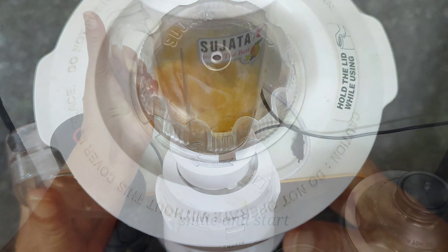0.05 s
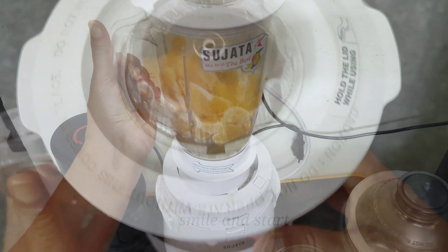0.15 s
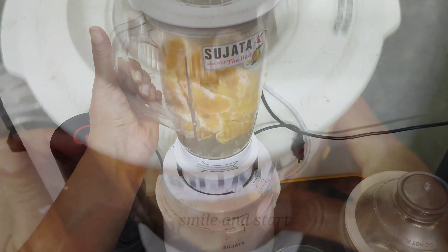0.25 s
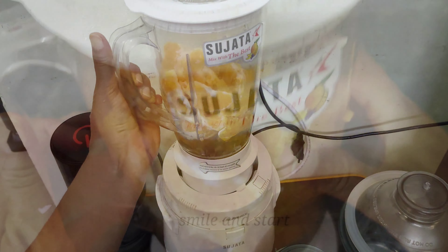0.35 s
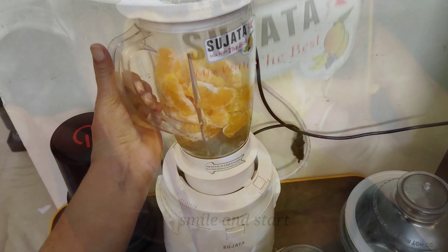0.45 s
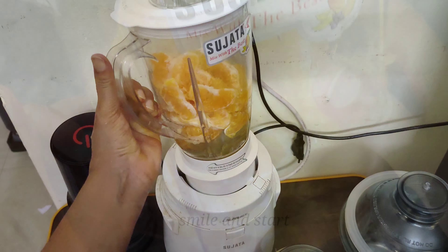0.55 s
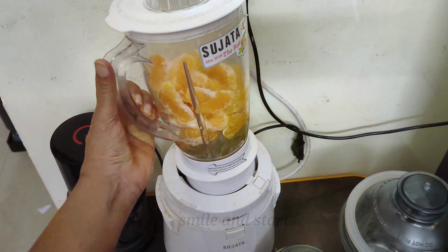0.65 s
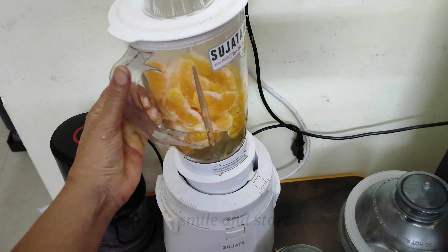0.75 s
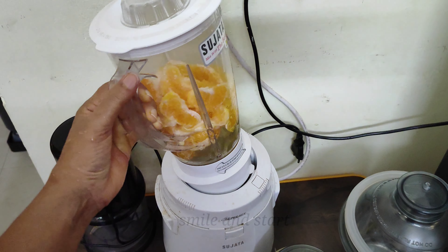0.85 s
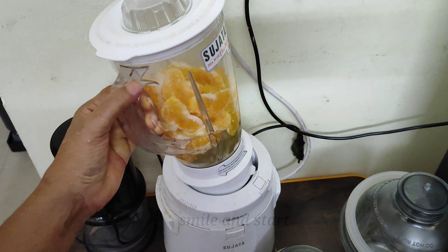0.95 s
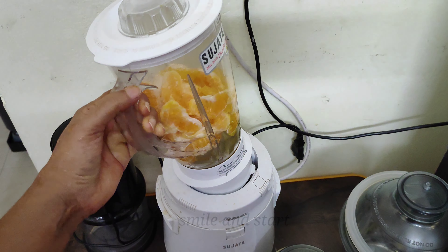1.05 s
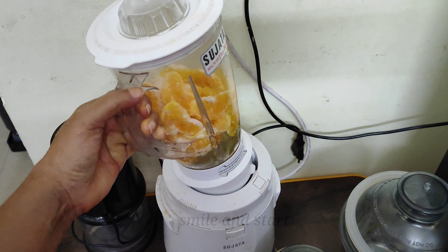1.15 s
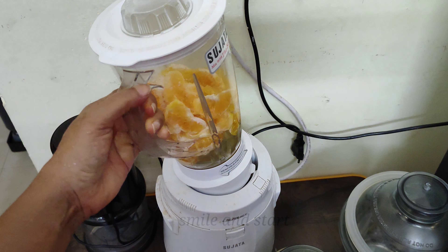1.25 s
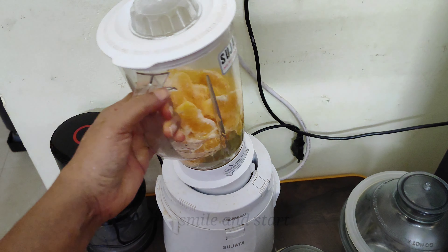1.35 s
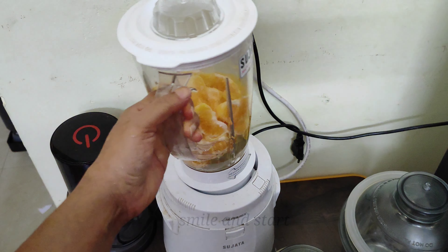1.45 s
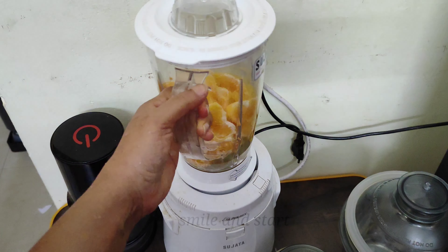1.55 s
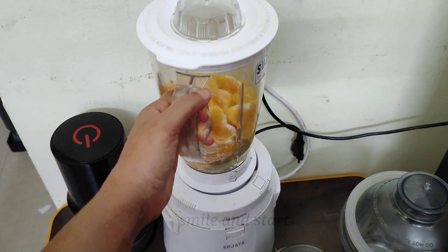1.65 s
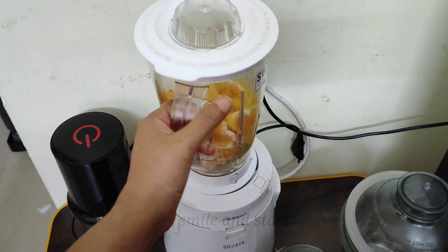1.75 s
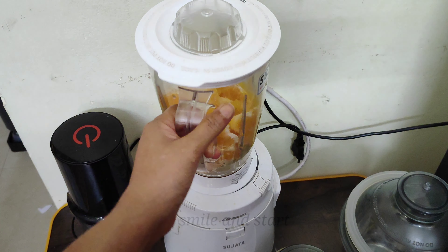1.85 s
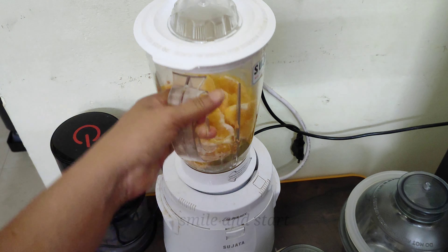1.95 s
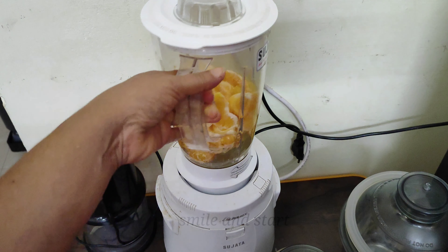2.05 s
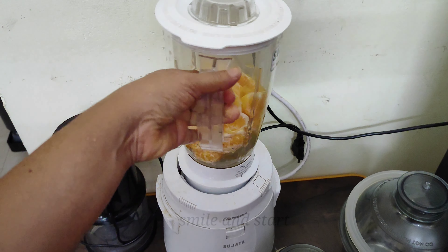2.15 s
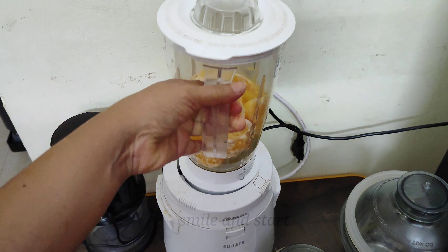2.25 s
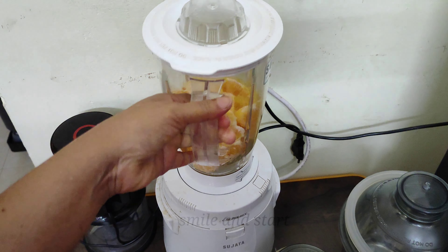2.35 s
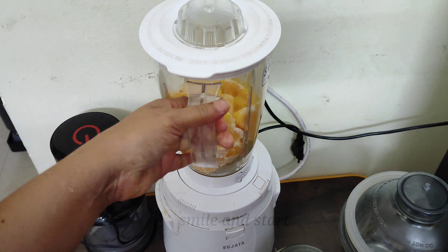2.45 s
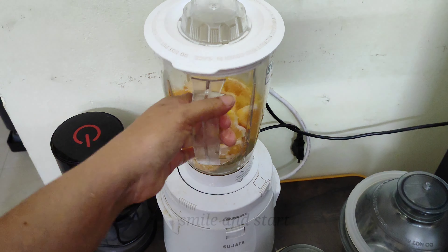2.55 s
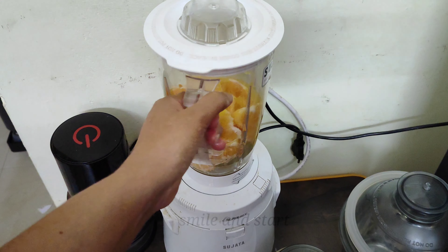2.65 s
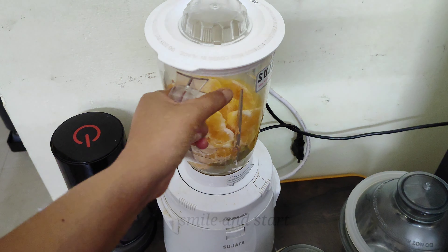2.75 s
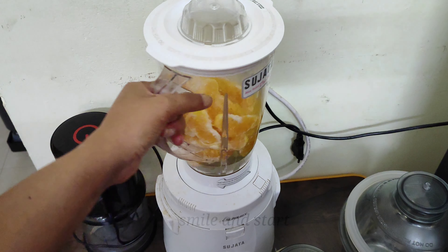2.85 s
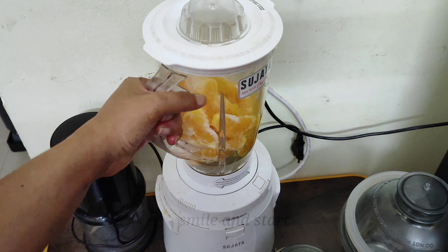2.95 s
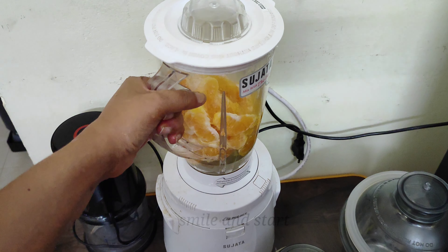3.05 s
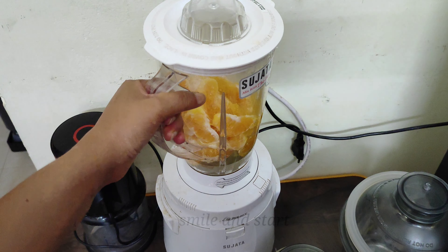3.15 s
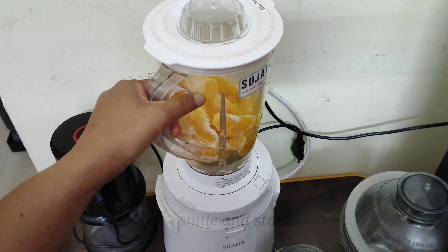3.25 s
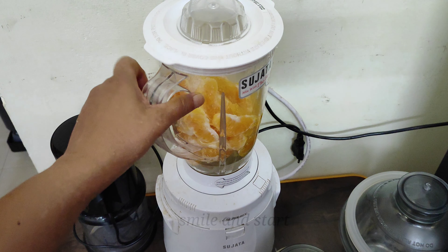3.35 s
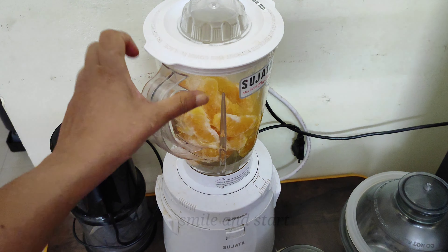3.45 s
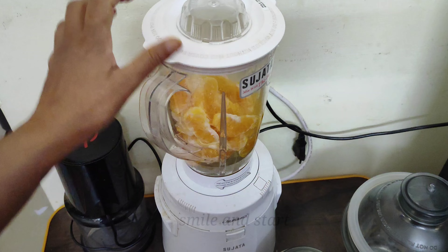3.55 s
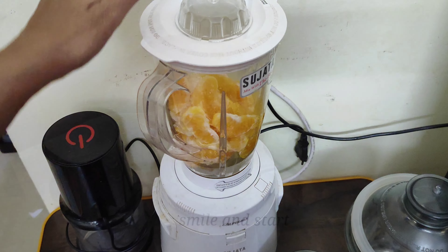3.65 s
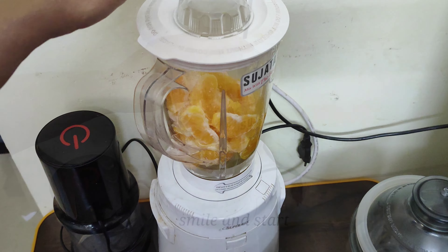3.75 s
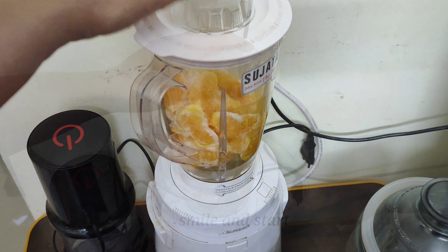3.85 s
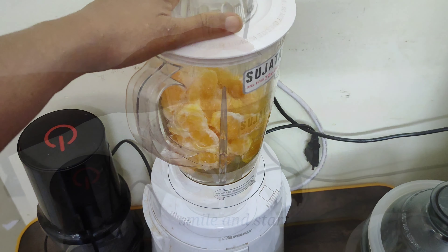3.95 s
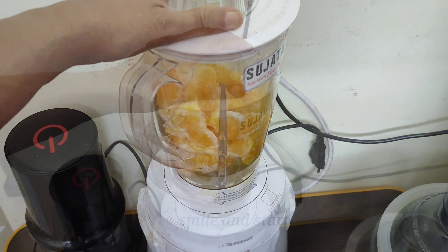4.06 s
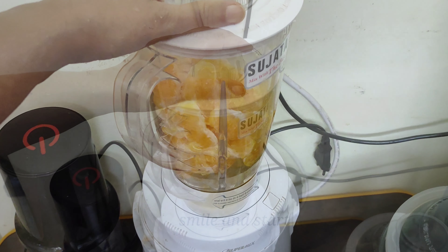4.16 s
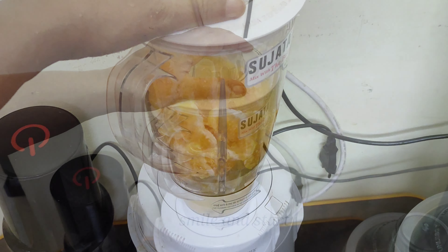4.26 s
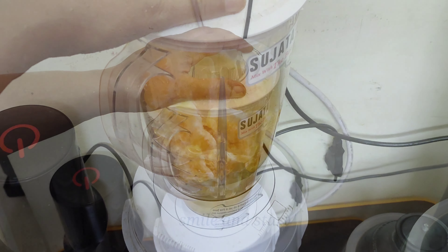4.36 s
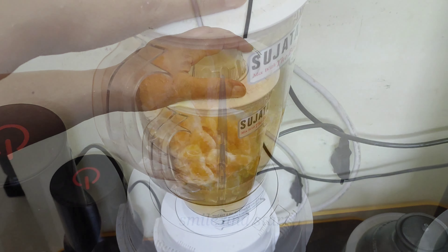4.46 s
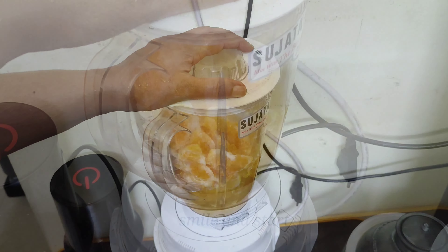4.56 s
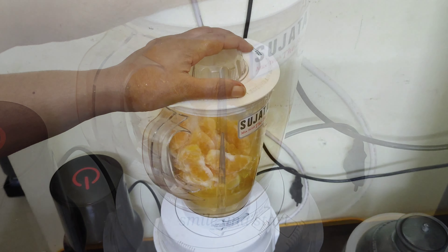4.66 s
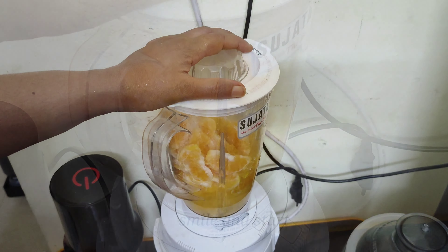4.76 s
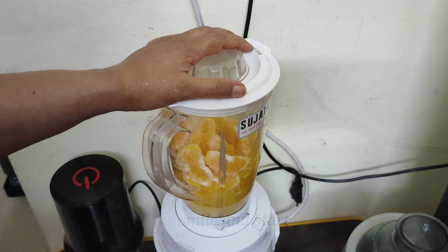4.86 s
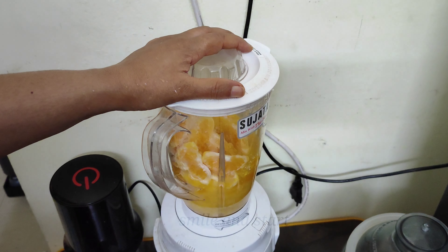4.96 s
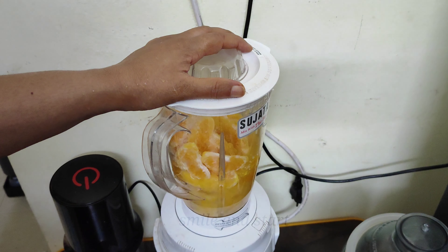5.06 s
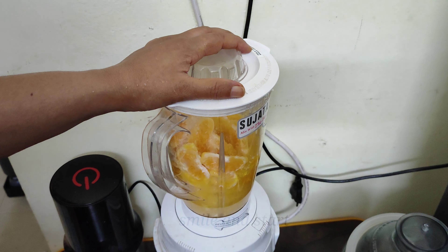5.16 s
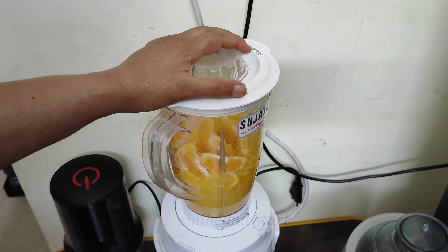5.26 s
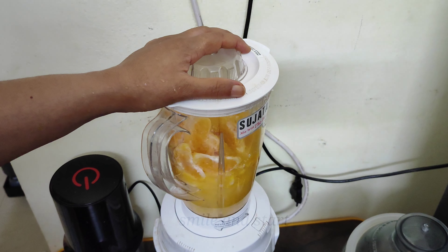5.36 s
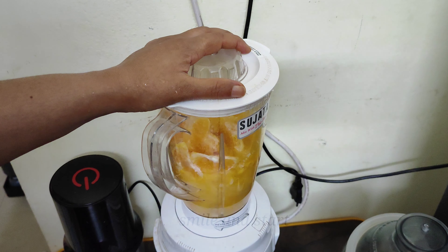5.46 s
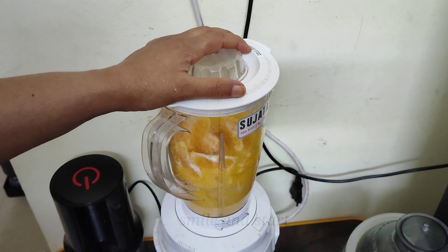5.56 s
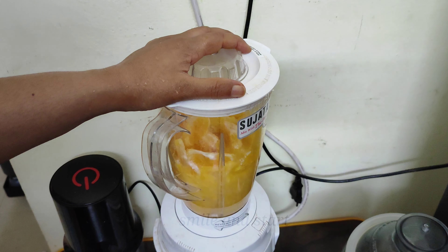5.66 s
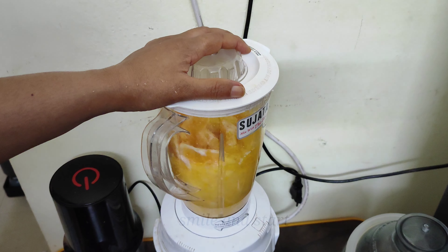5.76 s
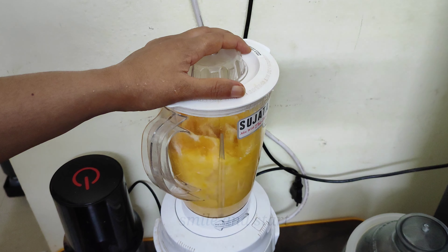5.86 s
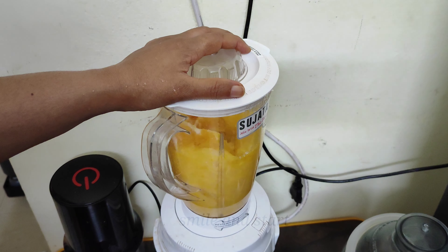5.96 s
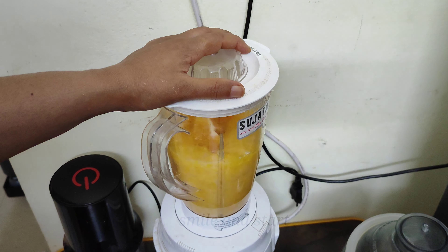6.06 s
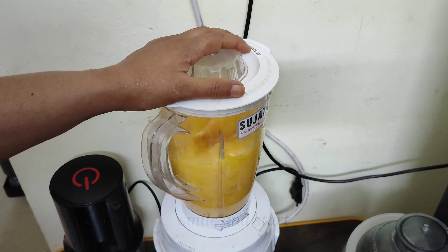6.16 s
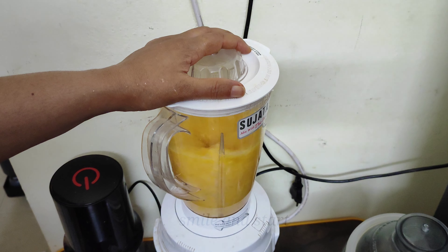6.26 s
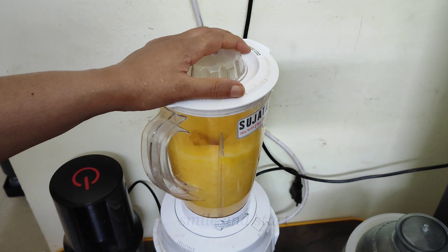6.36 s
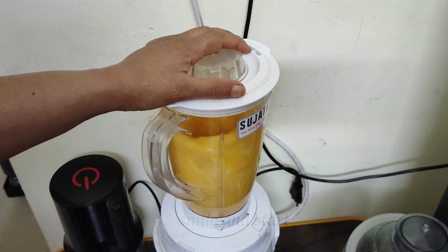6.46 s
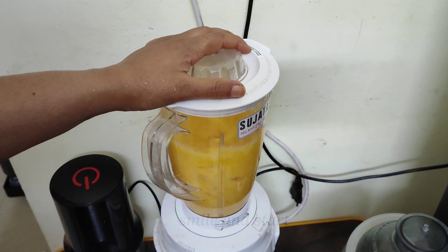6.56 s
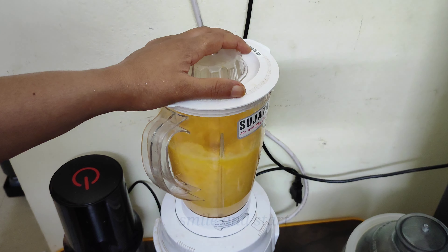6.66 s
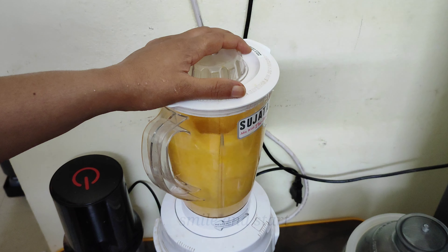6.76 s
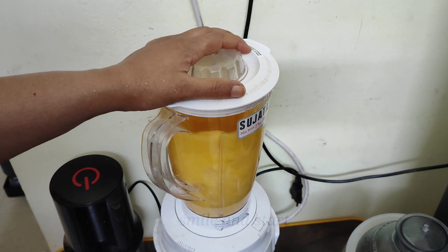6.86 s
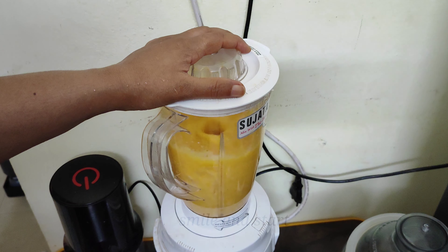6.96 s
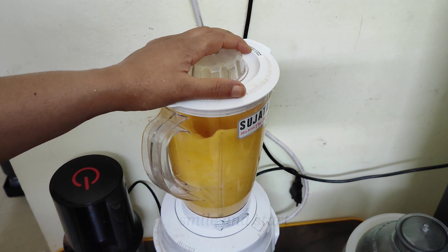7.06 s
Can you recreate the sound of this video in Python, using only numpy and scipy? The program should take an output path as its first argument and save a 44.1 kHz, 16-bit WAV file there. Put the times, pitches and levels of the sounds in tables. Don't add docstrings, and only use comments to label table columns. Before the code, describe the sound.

Plastic jar clatters and locks into place in an echoing kitchen, a soft lid pat, then a blender whirs up into a roaring, wet churn.

```python
import sys
import numpy as np
from scipy import signal
from scipy.fft import rfft, irfft, next_fast_len
from scipy.io import wavfile
from scipy.ndimage import uniform_filter1d, map_coordinates

SR = 44100
rng = np.random.default_rng(int(sys.argv[2]) if len(sys.argv) > 2 else 0)


def gain_from_db(level_db):
    decades = np.asarray(level_db, float) / 20
    return 10 ** decades


def wav_record(signal):
    frames = np.transpose(np.atleast_2d(signal))
    bounded = np.clip(frames, -1, 1)
    quanta = np.round(bounded * 32767).astype(np.int16)
    wavfile.write(sys.argv[1], SR, quanta)


N = 313478

# [f/Hz, time to fall 60 dB/s]
KITCHEN_DECAY = [(100, 0.69), (300, 0.52), (1000, 0.57), (3000, 0.47), (10000, 0.4)]
# [f/Hz, likeness 0 to 1]
LIKENESS = [(40, 0.28), (130, 1), (290, 1), (630, 0.55), (1400, 0.3), (3000, 0.35), (6000, 0.2),
            (11000, 0.3)]
# [f/Hz, level/dB]
MICROPHONE_DIFFERENCE = [(60, 0.5), (300, 0.6), (700, -1.5), (1400, 0.5), (5000, -0.2), (7300, 5),
                         (9000, -13), (11500, -5), (14500, -0.5)]
# [f/Hz, level against the mean/dB]
MASKING = [(2500, -17), (3600, -9), (5000, -7), (6500, -8), (7500, -7.5), (8600, -10), (10500, -9),
           (11500, -10), (13000, -10.5), (15000, -10.5)]

# [t/s, length/s, start f/Hz, end f/Hz, level/dB]
CHIRPS = [
    (0, 0.035, 3450, 3360, -54),
    (0.035, 0.039, 4450, 3700, -51),
    (0.073, 0.04, 3700, 3740, -55),
    (0.153, .045, 4150, 3900, -54),
    (0.2, .04, 3650, 3700, -60),
]

# [f/Hz, level/dB per Hz]
AIR_COLOUR = [(12, -42), (20, -0.5), (152, 1), (236, -24), (339, -7), (1030, -14.5), (2000, -17.5),
              (4240, -19.5), (4870, -29.5), (6790, -27.5), (7380, -36), (9210, -29), (15200, -22)]
# [f/Hz, level/dB per Hz]
RUB_COLOUR = [(24, -50), (40, -26), (70, 2.5), (296, 2.5), (443, -14), (637, -5), (1220, -15),
              (1340, -13.5), (1580, -15.5), (5000, -28.5), (6500, -65.5), (11000, -120)]
# [f/Hz, level/dB per Hz]
RUSTLE_COLOUR = [(2350, -14.5), (4000, -13), (4760, -16), (6760, -15.5), (8260, -39), (8690, -14),
                 (9500, -12.5), (13100, -15), (15200, -53)]
# [f/Hz, level/dB per Hz]
RUMBLE_COLOUR = [(15, -41), (30, -17), (70, -16), (110, -7), (160, -35), (300, -120)]
# [t/s, rubbing level/dB]
GRIP = [(0.0, -52), (0.3, -71), (0.47, -39), (0.73, -44), (0.79, -54), (0.87, -29.5), (1.24, -42.5),
        (1.42, -48), (1.5, -38.5), (1.92, -51), (2.1, -45.5), (2.21, -39), (2.45, -47), (2.78, -40.5),
        (2.95, -41.5), (3.41, -56), (3.95, -59), (4.14, -62)]
# [t/s, extra rumble level/dB, half length/s]
SHOVES = [
    (0.337, 31, 0.06),
    (0.7, 28, 0.049),
    (.97, 17, 0.093),
    (1.32, 9, .05),
    (2.8, 5, .06),
    (3.25, 5, .08),
]

# [t/s, peak level/dB]
TICKS = [(0.218, -42), (0.259, -46.5), (0.316, -23), (0.432, -36), (0.469, -45), (0.734, -35.5),
         (0.862, -46), (0.882, -11), (0.983, -15.5), (1.237, -31.5), (1.567, -26), (1.907, -46),
         (1.934, -31), (2.05, -31), (2.258, -26), (2.48, -39), (2.685, -26), (3.014, -24.5), (3.118, -34),
         (3.345, -50), (3.539, -52), (3.758, -43), (3.78, -41), (4.03, -24.5)]
# [f/Hz, level/dB per Hz]
TICK_COLOUR = [(1500, -46), (3500, -4.5), (6500, -12), (7700, -19), (9100, -4.5), (12000, -10.5),
               (15200, -14.5)]

# [f/Hz, level/dB, time to fall 60 dB/s]
BASE_MODES = [(140, -43, 0.08), (195, 6.5, 0.052), (255, 7.5, 0.052), (319.5, -7.5, 0.26),
              (399, -0.5, 0.15)]
# [f/Hz, level/dB, time to fall 60 dB/s]
JAR_MODES = [(576, -2.5, 0.16), (679, -3, 0.23), (747, -0.5, 0.078), (834, 3, 0.063), (1060, 0, 0.047),
             (1362, -3.5, 0.12), (1440, -8, 0.11), (1727, 5.5, 0.037), (2244, 1.5, 0.035),
             (2480, -32, 0.065), (2830, -8, 0.12), (3257, 8, 0.016)]
# [f/Hz, level/dB per Hz]
CRACK_COLOUR = [(180, -30.5), (300, -17), (499, -6), (765, 0), (1010, -5), (1360, -3.5), (1980, -11.5),
                (2220, -5), (2750, -12.5), (4430, -16.5), (7620, -27), (9430, -31), (15200, -28)]
# [t/s, peak level/dB, crack level/dB, favoured jar f/Hz, extra thud level/dB]
SEATS = [(0.258, -31.5, -36, 1070, -3), (0.317, -11, -18, 1820, 1.5), (0.473, -24, -30, 847, 6.5),
         (0.517, -32, -32.5, 1450, 4), (0.612, -24, -35.5, 773, 6), (0.645, -28, -41, 820, -1),
         (0.706, -34.5, -31, 750, 4), (0.738, -31, -22, 840, -2), (0.893, 0.5, -13.5, 1436, 2.5),
         (1.345, -31.5, -36, 1373, -10), (1.566, -3.5, -14, 1348, -0.5), (1.938, -30.5, -17, 830, 1.5),
         (2.01, -48, -33, 690, 8), (2.249, -19, 5.5, 880, -1), (2.553, -30, -33, 687, 7.5),
         (3.134, -24, -36.5, 586, -8), (3.831, -47, 0, 770, -8), (4.033, -31.5, -23, 706, 5),
         (4.166, -18.5, -13, 1380, 2)]
# [t/s, peak level/dB, crack level/dB, favoured jar f/Hz, extra thud level/dB]
LUGS = [(0.435, -23.5, -36, 830, -5), (0.865, -28, -22, 716, 3), (0.88, -4.5, -8, 697, -2),
        (0.914, -12.5, -15, 632, 1), (1.454, -35.5, -34, 660, 4), (1.572, -13.5, -28, 699, -17),
        (2.047, -25, -18, 605, -2), (2.053, -18.5, -18, 627, -0.5), (2.126, -31.5, -34, 702, 7),
        (2.259, -2.5, -23, 1384, -0.5), (2.275, -33, -30, 730, -6), (2.481, -20.5, -12, 659, -5),
        (2.682, -23, -38, 790, 0), (2.745, -27.5, -11, 1270, -1), (2.756, -29, -34, 400, 5),
        (3.016, -20, -20, 764, -8), (3.021, -18.5, -20, 330, 6.5), (3.052, -21, -31, 1330, -2),
        (3.111, -22.5, -29.5, 662, -8), (3.224, -29, -36, 747, -2), (3.539, -42, -21, 1130, -2)]
# [t/s, peak level/dB, crack level/dB, favoured jar f/Hz, extra thud level/dB]
DRAGS = [(0.84, -38.5, -24.5, 716, -3), (0.935, -17, -23, 682, 6.5), (0.975, -8, -14, 737, -9),
         (1.01, -24, -25, 706, -6), (1.075, -21, -32, 452, 6), (1.097, -14.5, -19, 840, -7.5),
         (1.128, -19, -7.5, 1110, 1), (1.468, -45.5, -26, 1370, 0), (1.536, -19.5, -20, 776, 2),
         (1.63, -23.5, -30, 668, -24), (1.7, -29, -30, 679, 1), (1.848, -29, -34, 815, 6),
         (2.15, -38.5, -34, 690, 5), (2.205, -28, -29.5, 585, 10), (2.345, -25, -28, 637, -8),
         (2.472, -21, -34, 420, 6.5), (2.51, -34, -30, 680, -4), (2.83, -35, -30, 644, -3)]

# [t/s, level/dB, f/Hz, contact time/s]
PATS = [
    (4.031, -15, 195, 0.018),
    (4.054, -21.5, 188, 0.027),
]
# (t/s, level/dB, time to fall 60 dB/s)
SWITCH = (4.129, -3.5, .018)
# [f/Hz, level/dB per Hz]
SNAP_COLOUR = [(180, -50), (300, -23), (740, -14.5), (1230, -23), (1680, -11), (4020, -6), (4810, -14.5),
               (6570, -6.5), (7740, -33.5), (9120, 0.5), (15200, -15)]

# [t/s, turns per second]
SPEED = [(4.12, 20), (4.26, 102), (4.4, 143), (4.48, 157), (4.58, 180.5), (4.71, 198), (4.89, 218.5),
         (5.05, 226), (5.25, 233.5), (5.36, 239.5), (5.5, 233.5), (5.64, 239), (5.73, 238), (5.82, 231),
         (6.03, 237), (6.34, 237), (6.5, 226), (6.7, 240.5), (6.8, 240), (6.88, 230), (7.05, 241),
         (7.11, 240)]
# [t/s, churn level/dB]
LOAD = [(4.16, -33), (4.22, -18.5), (4.36, -11.5), (4.64, -6.5), (4.78, -8.5), (4.9, -6), (5.15, -5.5),
        (5.23, -5.5), (5.33, -2), (5.56, -6.5), (5.69, -2.5), (5.88, -10.5), (5.91, -1), (5.98, -9),
        (6.08, -3), (6.15, -9.5), (6.21, -5), (6.38, -5), (6.5, -4), (6.57, -7.5), (6.64, -4), (6.88, -4.5),
        (6.96, -9), (7.03, -3), (7.11, -3)]
# [multiple of shaft speed, left level/dB, right level/dB, unsteadiness/dB]
ROTOR_TONES = [(1, -20, -20, 2.2), (2, -22, -22, 3.5), (3, -32, -28, 4), (4, -25, -24, 4), (6, -26, -27, 4),
               (12, -19, -18, 3.4), (24, -28, -28, 2.5), (36, -33, -31, 3), (48, -28, -23, 2),
               (60, -31, -31, 1.8)]
# [f/Hz, level/dB]
VENTS = [(100, -6), (165, 2), (200, -3), (235, -4), (380, -5), (540, -5), (700, -6), (1500, -8), (1950, -3),
         (2120, 4), (2400, 3.5), (2600, -1), (2700, -5), (2790, -1), (2870, -6), (3750, -5), (4150, 7),
         (4700, -5), (5600, -6), (5770, 8), (5950, -6), (7500, -15), (8300, -8), (8800, -1), (9700, -1.5),
         (10400, 3), (11000, 2.5), (11400, -4), (12500, -2), (13500, 2), (14200, 5)]
# [f/Hz, width/Hz, level/dB]
HOUSING = [(474, 54, 2), (720.5, 35, 8.5), (830, 21, 3.5), (895, 39, 6.5), (1059, 19, 5), (1170, 28, 1.5),
           (1201, 53, 7.5), (1271, 57, 3), (1300, 43, 5.5), (1590, 60, -2), (2184, 50, -2.5),
           (2550, 380, 7.5), (3263, 280, 10)]
# [f/Hz, level/dB per Hz]
GRIND_COLOUR = [(18, -55), (30, -39.5), (157, -6), (354, -6), (528, -4.5), (998, -8), (1220, -2),
                (1460, -7), (1890, -7.5), (2170, -9), (3500, -17.5), (4550, -22.5), (7700, -120)]
# [f/Hz, level/dB per Hz]
CHURN_COLOUR = [(18, -56.5), (30, -44), (166, -8), (238, -2.5), (296, -3), (459, 0.5), (631, -7.5),
                (712, -4.5), (1190, -0.5), (1580, -2), (2760, -7.5), (3500, -15.5), (4550, -58),
                (7700, -120)]
# [f/Hz, level/dB per Hz]
RUSH_COLOUR = [(2060, -46.5), (3450, 3.5), (3620, 1), (4590, -2), (5830, -2.5), (7900, -8.5), (8300, -6.5),
               (8600, -3.5), (9200, -0.5), (9900, -6), (10600, -8.5), (11200, -6.5), (11900, -3.5),
               (12500, -10.5), (12900, -5), (13500, -13), (14200, -8.5), (15200, -11.5)]

FREE_TURNS = 241


def unit(x):
    return x / np.sqrt(np.mean(x ** 2) + 1e-20)


def along(points, hz):
    f, v = np.transpose(points)
    return np.interp(np.log(hz + 1), np.log(f + 1), v)


def colour(spectrum):
    return lambda hz: gain_from_db(along(spectrum, hz))


def curves(rows):
    s, *columns = np.transpose(rows)
    return [np.interp(np.arange(N) / SR, s, column) for column in columns]


def wobble(rate):
    at = np.arange(0, N + 64, 32)
    knots = rng.standard_normal(int(N * rate / SR) + 4)
    return np.interp(np.arange(N), at, map_coordinates(knots, [at * rate / SR]))


def filtered(x, response):
    size = next_fast_len(x.shape[-1] + 8192)
    spectrum = rfft(x, size) * response(np.fft.rfftfreq(size, 1 / SR))
    return irfft(spectrum, size)[..., :x.shape[-1]]


def paired(two, gain):
    turn = lambda hz: np.arccos(np.clip(along(LIKENESS, hz), -1, 1)) / 2
    mid, side = filtered(two, lambda hz: gain(hz) * [np.cos(turn(hz)), np.sin(turn(hz))])
    return np.array([mid + side, mid - side])


def noise(gain, patchy_db):
    z = signal.stft(rng.standard_normal((2, N)), nperseg=512)[2]
    patches = uniform_filter1d(rng.standard_normal(z.shape[1:]), size=5, axis=0)
    patches = unit(uniform_filter1d(patches, size=8, axis=1))
    patchy = signal.istft(z * gain_from_db(patchy_db * patches), nperseg=512)[1][:, :N]
    return unit(paired(patchy, gain))


def burst(spectrum, size, low_hz, corner_hz=1e5):
    gain = lambda hz: colour(spectrum)(hz) * (hz > low_hz) / np.hypot(1, hz / corner_hz)
    return unit(paired(rng.standard_normal((2, size)), gain))


def kitchen_echo():
    hz, t, z = signal.stft(rng.standard_normal((2, 2 * SR // 5)), SR, nperseg=256)
    decay = gain_from_db(-60 * t / along(KITCHEN_DECAY, hz)[:, None])
    x = signal.istft(z * decay, SR, nperseg=256)[1]
    onset = np.minimum(np.arange(x.shape[1]) / (0.00043 * SR), 1)
    x = paired(x * onset, lambda hz: 1 + 0 * hz)
    return x / np.linalg.norm(x[0])


def add(out, s, hit, wet_db):
    wet = gain_from_db(wet_db) * signal.fftconvolve(hit, kitchen_echo(), axes=1)
    wet[:, :hit.shape[1]] += hit
    start = round(s * SR)
    out[:, start:start + wet.shape[1]] += wet


def house_air():
    return gain_from_db(-52) * noise(colour(AIR_COLOUR), patchy_db=1.5)


def bird():
    song = np.zeros(N)
    for s, length, from_hz, to_hz, db in CHIRPS:
        u = np.arange(round(length * SR)) / (length * SR)
        cycles = length * (from_hz * u + (to_hz - from_hz) * u * u / 2)
        chirp = gain_from_db(db) * np.sin(np.pi * u) * np.sin(2 * np.pi * cycles)
        song[round(s * SR):][:len(u)] += chirp
    return signal.fftconvolve(gain_from_db(4 * wobble(200)) * song[None], kitchen_echo(), axes=1)[:, :N]


def handling():
    t = np.arange(N) / SR
    grip_db = curves(GRIP)[0]
    settling = np.zeros(N)
    for s, db, *_ in [*LUGS, *SEATS]:
        settling += gain_from_db(2 * (db - 23 - 60 * np.abs(t - s) / 0.5)) * (t > s)

    skin = gain_from_db(2.5 * wobble(25)) * noise(colour(RUB_COLOUR), patchy_db=3)
    slide = filtered(skin, lambda hz: 1 / (1 + (130 / (hz + 1)) ** 4))
    rub = gain_from_db(grip_db) * skin + np.sqrt(settling) * slide

    rub_db = 10 * np.log10(gain_from_db(2 * grip_db) + settling)
    rustle = gain_from_db(rub_db - 13 + 2.2 * wobble(30)) * noise(colour(RUSTLE_COLOUR), patchy_db=2)

    rumble_db = -53.5 + 0.55 * (grip_db + 40)
    for s, db, half_s in SHOVES:
        rumble_db = rumble_db + db * np.exp(-((t - s) / half_s) ** 2)
    rumble = gain_from_db(rumble_db) * noise(colour(RUMBLE_COLOUR), patchy_db=8.0)
    return rub + rustle + rumble


def ticks():
    out, t = np.zeros((2, N + SR)), np.arange(SR // 20) / SR
    for s, db in TICKS:
        shape = gain_from_db(db - 60 * t / 0.013) * (1 - np.exp(-t / 0.00066))
        add(out, s, shape * burst(TICK_COLOUR, len(t), low_hz=1500), wet_db=-4.5)
    return out[:, :N]


def ring(modes, t, scale, favoured_hz):
    hz, db, t60 = np.transpose(modes)[:, :, None, None]
    chance = rng.standard_normal((len(modes), 3, 1))
    near = np.exp(-(np.log(hz / favoured_hz) / 0.1026) ** 2)
    hz = hz * (1 + 0.0069 * chance[:, :1]) * (1 - near) + favoured_hz * near
    strength_db = db + 2 * chance[:, :1] + 10 * near
    skew = 0.51 * np.arccos(along(LIKENESS, hz)) * chance[:, 1:]
    decay = gain_from_db(strength_db - 60 * t / (t60 * scale))
    return np.sum(decay * np.sin(2 * np.pi * hz * t + skew), axis=0)


def contact(t, db, crack_db, favoured_hz, thud_db, base_hz, rise_s):
    scale = 1.45 + 0.015 * (db + 12.0)
    thud_db = thud_db - 0.9 * max(db + 12.0, 0)
    rise = 1 - np.exp(-t / rise_s)
    chatter = unit(uniform_filter1d(rng.standard_normal(len(t)), size=160))
    rattle = gain_from_db((1.5 + 60 * t).clip(None, 6) * chatter)

    jar = gain_from_db(-14.0) * rattle * ring(JAR_MODES, t, 0.74 * scale, favoured_hz)
    corner_hz = 9300 * gain_from_db(0.55 * db)
    knock = burst(CRACK_COLOUR, len(t), low_hz=241, corner_hz=corner_hz)
    knock = gain_from_db(-5.5 - 60 * t / (0.067 * scale)) * rattle * knock
    crack = burst(TICK_COLOUR, len(t), low_hz=1500)
    crack = gain_from_db(crack_db + 1.0 - 60 * t / (0.022 * scale)) * rattle * crack
    thud = gain_from_db(thud_db - 9.5) * rise * ring(BASE_MODES, t, scale, base_hz)
    return gain_from_db(db) * rise * (jar + knock + crack + thud)


def knocks():
    out, t = np.zeros((2, N + SR)), np.arange(SR // 5) / SR
    # events, base f/Hz, thud level/dB, rise/s
    kinds = [(SEATS, 195, -2.5, 0.0007), (LUGS, 285, 2, 0.0007), (DRAGS, 195, -2.5, 0.0051)]
    for events, base_hz, thud_db, rise_s in kinds:
        for s, db, crack_db, favoured_hz, extra_db in events:
            hit = contact(t, db, crack_db, favoured_hz, thud_db + extra_db, base_hz, rise_s)
            add(out, s - 0.0015, hit, wet_db=-6.0)
    return filtered(out[:, :N], lambda hz: (1j * hz / (1j * hz + 110)) ** 2)


def lid_pats():
    out, t = np.zeros((2, N + SR)), np.arange(SR // 5) / SR
    for s, db, hz, contact_s in PATS:
        press = np.sin(np.pi * np.minimum(t / contact_s, 1) ** 1.2) ** 0.33
        thump = press * np.sin(2 * np.pi * hz * t)
        slap = gain_from_db(-15.5 - 60 * t / 0.12) * burst(CRACK_COLOUR, len(t), low_hz=300)
        add(out, s, gain_from_db(db) * (thump + slap), wet_db=-11.5)
    return out[:, :N]


def switch():
    out, t = np.zeros((2, N + SR)), np.arange(SR // 5) / SR
    s, db, t60 = SWITCH
    shape = gain_from_db(db - 60 * t / t60) * (1 - np.exp(-t / 0.00094))
    add(out, s, shape * burst(SNAP_COLOUR, len(t), low_hz=250), wet_db=1.5)
    return out[:, :N]


def shaft():
    return uniform_filter1d(curves(SPEED)[0], size=1800)


def mains_hum(speed, churn_db):
    t = np.arange(N) / SR
    hum_db = -20.5 + 4 * np.log(1.01 - speed / FREE_TURNS) + 1.3 * (churn_db + 7).clip(-6)
    return gain_from_db(hum_db + 1.1 * wobble(8.4)) * np.sin(2 * np.pi * 100 * t)


def rotor_tones(speed, turns):
    t = np.arange(N) / SR
    effort_db = 55 * np.log10(speed / 172).clip(None, 0) + 70 * np.log10(speed / 135).clip(None, 0)
    tones = np.zeros((2, N))
    for k, left_db, right_db, loose_db in ROTOR_TONES:
        slow = 0.55 * np.array([wobble(22), wobble(22)])
        fast = 1.3 * min(k / 6, 1) * wobble(260)
        level = gain_from_db([[left_db], [right_db]] + effort_db + 5.5 + loose_db * (slow + fast))
        skew = 0.48 * np.array([wobble(25), wobble(25)]) * np.arccos(along(LIKENESS, 235 * k))
        tones += level * np.sin(2 * np.pi * k * turns + skew)
    tones = filtered(tones * (1 + 0.24 * np.cos(2 * np.pi * 100 * t)), colour(VENTS))
    echo = signal.fftconvolve(tones, kitchen_echo(), axes=1)[:, :N]
    return gain_from_db(-3.5) * tones + gain_from_db(-3.5) * echo


def air_rush(speed, churn_db):
    t = np.arange(N) / SR
    rush_db = churn_db - 8.5 + 5 * np.log2(speed / FREE_TURNS) + 0.6 * (t - 5)
    rush_db = rush_db + 0.07 * (churn_db + 6.0) * (speed > 200)
    return gain_from_db(rush_db + 2.5) * noise(colour(RUSH_COLOUR), patchy_db=0.5)


def through_housing(spectrum, shaken=1):
    def gain(hz):
        peaks_db = sum(db / (1 + (2 * (hz - centre) / width) ** 2) for centre, width, db in HOUSING)
        return gain_from_db(along(spectrum, hz) + shaken * peaks_db)
    return gain


def fruit_churn(speed, churn_db):
    pulped = np.clip((speed - 172) / 55, 0, 1)
    pulp = np.sqrt(pulped) * noise(through_housing(CHURN_COLOUR), patchy_db=1.6)
    whole = np.sqrt(1 - pulped) * noise(through_housing(GRIND_COLOUR, shaken=0.75), patchy_db=1.5)
    return gain_from_db(churn_db + 2.0) * (pulp + whole)


def motor():
    t = np.arange(N) / SR
    on = np.clip((t - 4.135) / 0.042, 0, 1)
    churn_db, speed = curves(LOAD)[0], shaft()
    turns = np.cumsum(speed * (1 + 0.0095 * wobble(160))) / SR
    blades = 1 + 0.051 * np.cos(2 * np.pi * turns + 0.62 * wobble(30))
    lumps = gain_from_db(0.11 * wobble(14))
    worked = lumps * blades * (air_rush(speed, churn_db) + fruit_churn(speed, churn_db))
    return on * (mains_hum(speed, churn_db) + rotor_tones(speed, turns) + worked)


def scene():
    background = house_air() + bird()
    jar = handling() + ticks() + knocks()
    return background + jar + lid_pats() + switch() + motor()


def lose_faint_treble(x, scatter_db, cut_db):
    hz, t, z = signal.stft(x, SR, nperseg=2048)
    power = np.abs(z) ** 2
    mean = power.mean(axis=1, keepdims=True)
    bands = rng.standard_normal((len(hz) // 16 + 1, len(t)))
    bands = unit(uniform_filter1d(bands, size=2))[np.arange(len(hz)) // 16]
    scatter = 0.8 * bands + 0.6 * rng.standard_normal(len(t))
    spare_db = 1.75 * np.log(mean / mean.max() + 1e-9).clip(-8, 0)
    need_db = along(MASKING, hz)[:, None] + 2.2 + spare_db + scatter_db * scatter
    masked = uniform_filter1d(power, size=2, axis=1) < gain_from_db(2 * need_db) * mean
    gain = np.where(masked & (hz[:, None] > 2500), gain_from_db(cut_db), 1)
    return signal.istft(z * gain, SR, nperseg=2048)[1][:, :N]


def top_cut(x):
    return signal.sosfilt(signal.butter(12, 15330, fs=SR, output="sos"), x)


def record(dry):
    lead_s = 0.0001
    sides = np.array([[1], [-1]])
    x = filtered(dry, lambda hz: gain_from_db(along(MICROPHONE_DIFFERENCE, hz) * sides / 2)
                 * np.exp(1j * np.pi * hz * lead_s * sides))
    x = x / (1 + np.abs(x / 0.96) ** 8) ** (1 / 8)
    mix = lose_faint_treble(x, scatter_db=4.4, cut_db=-30)
    return top_cut(mix)


dry = scene()
out = record(dry)
wav_record(out)
```